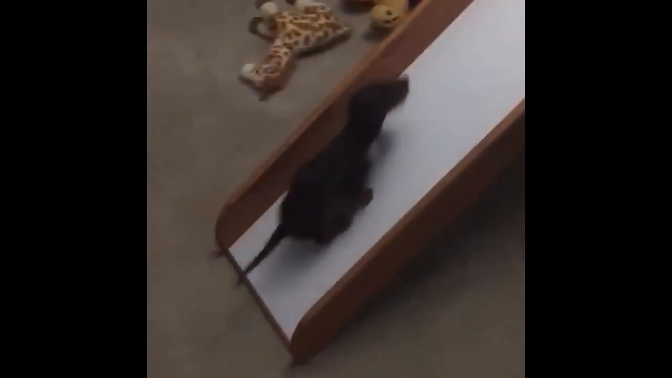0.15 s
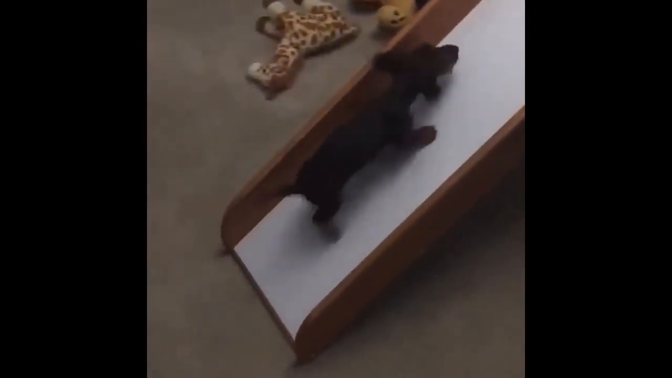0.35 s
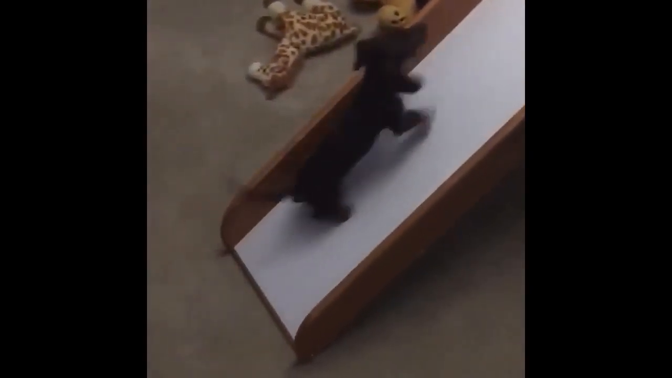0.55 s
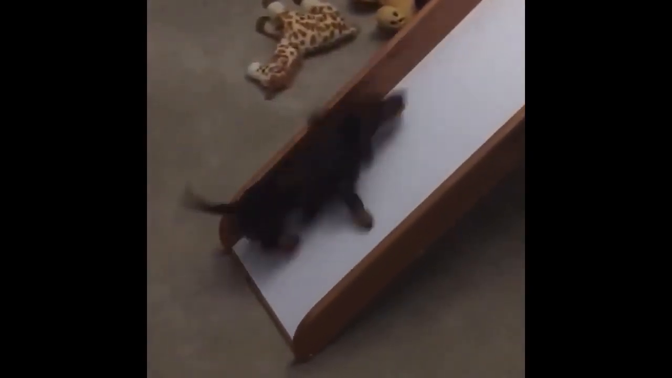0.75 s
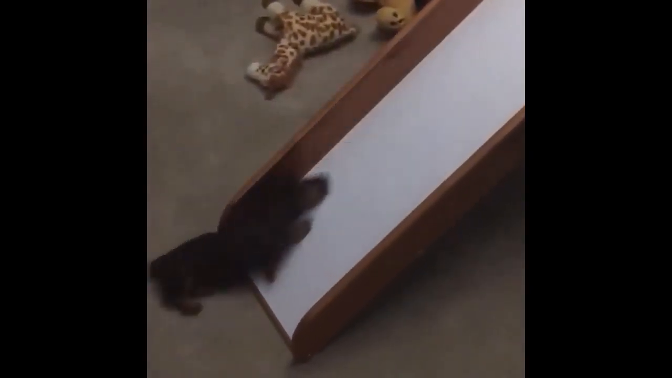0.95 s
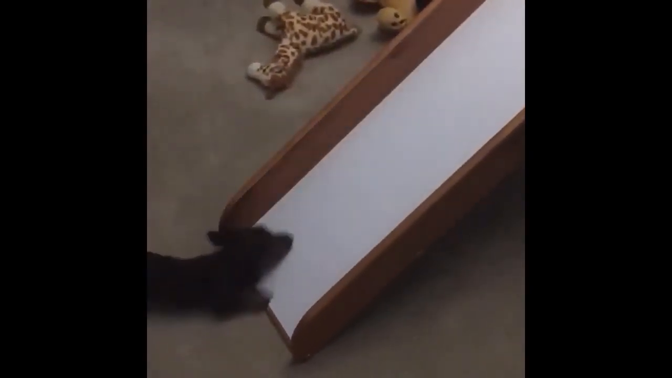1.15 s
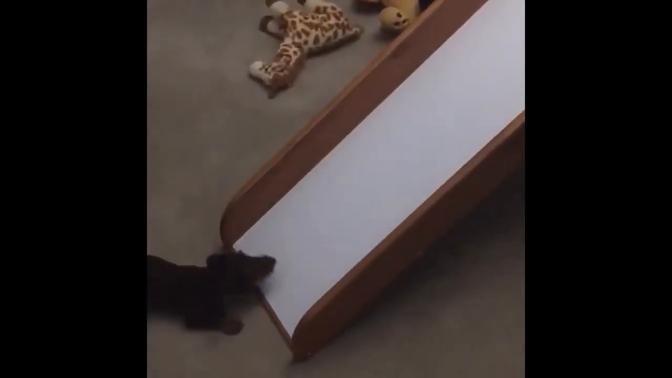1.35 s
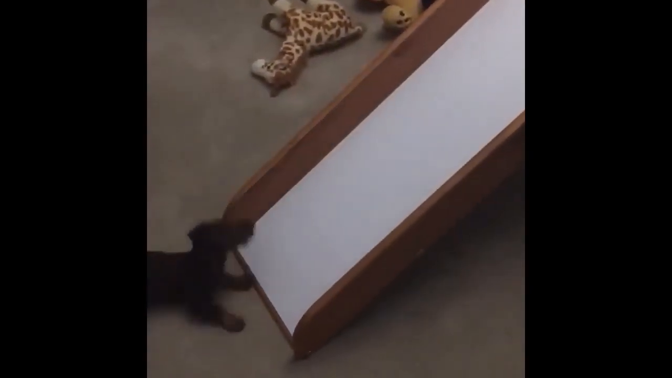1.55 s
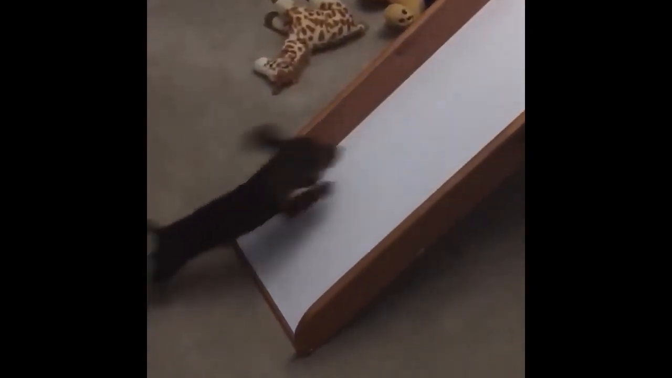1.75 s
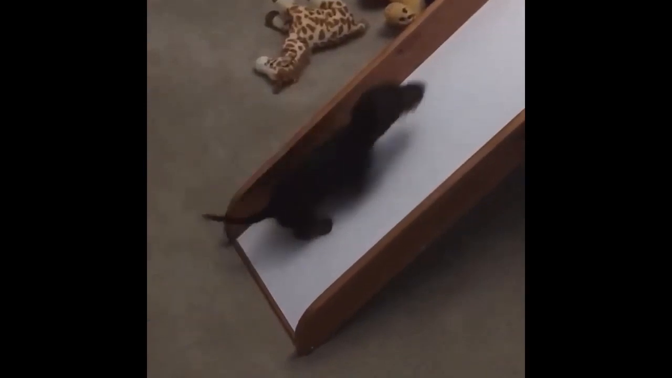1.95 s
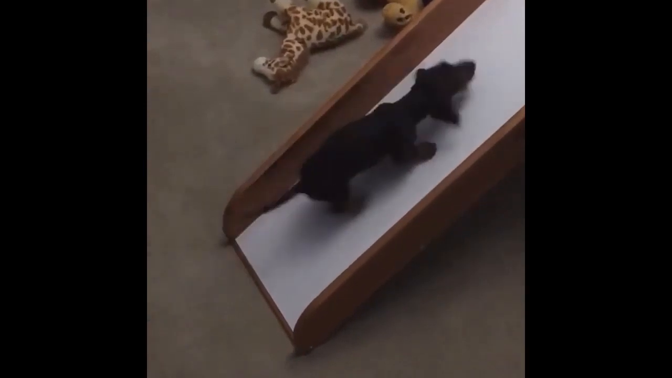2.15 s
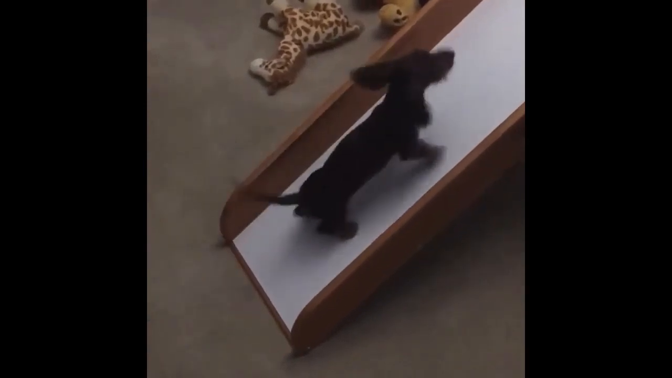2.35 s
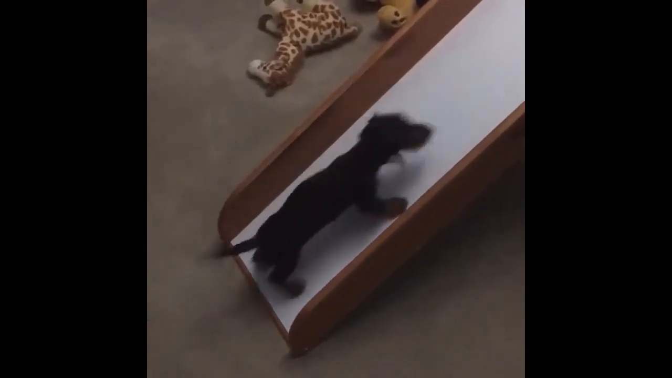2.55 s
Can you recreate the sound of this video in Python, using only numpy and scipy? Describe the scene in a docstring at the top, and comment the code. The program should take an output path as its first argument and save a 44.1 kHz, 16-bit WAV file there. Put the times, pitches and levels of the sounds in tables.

```python
"""A small dog twice scrambles up a smooth wooden ramp in a carpeted room and slips back down.
Paws and weight push on the ramp's decaying modes; pads slap it in short bursts of soft noise.
Claws click in bright bursts, ring the upper modes, and scrape as dense random clicks while sliding.
A paw brushes the carpet once; below lie a noise rumble and a faint, even ticking near the microphone."""
import sys
import numpy as np
from scipy import signal
from scipy.fft import rfft, irfft
from scipy.io import wavfile

SR = 44100
rng = np.random.default_rng(int(sys.argv[2]) if len(sys.argv) > 2 else 0)


def master_out(mix):
    """Clip the mix to full scale and print it as 16-bit PCM to the path in sys.argv[1]."""
    frames = np.transpose(np.atleast_2d(mix))
    ceiling = np.clip(frames, -1, 1)
    pcm = np.round(ceiling * 32767).astype(np.int16)
    wavfile.write(sys.argv[1], SR, pcm)


N = 114660

# Paws landing on the ramp. Each row: start in seconds, pad thump in dB, slap in dB, weight in dB,
# brightness in Hz (slap low-pass; also sets the pad's contact time).
PAW_LANDINGS = [(.036, -47, -65.5, -35.5, 300), (.205, -45, -42, -56, 1970), (0.225, -47, -72, -45, 900),
                (.234, -31.5, -43.5, -54, 1980), (.305, -35, -60, -52, 250),
                (.320, -25.5, -34.5, -20, 1640), (0.353, -30, -50, -27, 910), (0.422, -40, -45, -69, 1910),
                (.477, -33, -39, -27, 583), (.611, -37.5, -34.5, -21.5, 1690), (0.688, -54, -51, -30, 291),
                (0.781, -54, -46, -46, 1490), (.918, -35.5, -50, -47, 350), (0.9459, -23.5, -23, -44, 770),
                (.976, -21, -23.5, -11.5, 630), (.985, -55, -30.5, -47, 1840),
                (0.994, -33, -32.5, -36, 806), (1.116, -36, -34.5, -17.5, 1720),
                (1.134, -39, -43, -34, 940), (1.343, -45.5, -66, -32, 274), (1.381, -58, -58, -28, 1440),
                (1.475, -70, -84, -65, 905), (1.812, -58.5, -58.5, -32.5, 1520),
                (1.9633, -33, -36.5, -28.5, 810), (2.0835, -22.5, -34, -40, 1500),
                (2.1, -31, -50, -25, 1500), (2.158, -46, -42.5, -45, 1700),
                (2.194, -32.5, -34.5, -44, 2040), (2.228, -34, -41.5, -33, 1310),
                (2.274, -47, -44.5, -24.5, 920), (2.377, -39.5, -66, -37, 250), (2.546, -58, -61, -35, 250)]
# Modes of the ramp. Each row: frequency in Hz, level in dB, t60 in seconds.
RAMP_MODES = [(46.2, -12, 0.45), (61.5, -6.5, 0.27), (136.56, -5, 0.48), (153, -4, 0.18), (185, 1.5, 0.2),
              (218.5, -1.5, 0.24), (279.3, -7.5, 0.16), (341, -13.5, 0.3), (411.5, -13.5, 0.15),
              (525, -13.5, 0.091), (650.5, -13.5, 0.14), (695, -28, 0.21), (886, -20, 0.1),
              (1184, -9.5, 0.053), (1401, -14, 0.041), (1588, -19.5, 0.074)]
# Claws striking the surface. Each row: start in seconds, click in dB,
# upper-mode ring in dB before CLAW_RING_GAIN_DB, brightness in Hz (capped at TOP_HZ).
CLAW_STRIKES = [(0.2054, -34, -65, 11700), (0.2333, -31.5, -45, 11400), (.296, -43, -62, 8950),
                (0.324, -35.5, -43, 10700), (0.364, -34, -62, 8000), (0.421, -27.5, -31, 11300),
                (0.4769, -32, -34, 10900), (0.7813, -43, -43, 11800), (.862, -49, -64, 6960),
                (0.925, -54, -59, 6000), (0.943, -29.5, -69, 6800), (0.961, -27, -54, 4500),
                (0.995, -36.5, -62, 13000), (1.021, -33.5, -54, 15000), (1.031, -35, -24.5, 16000),
                (1.119, -40, -53, 6000), (1.3791, -42.5, -32, 5970), (1.801, -54, -39, 8100),
                (1.967, -38.5, -36, 8300), (1.985, -38.5, -35, 7750), (2.1, -36.5, -45, 9900),
                (2.161, -39.5, -32, 7950), (2.1949, -28, -28, 11800), (2.234, -35.5, -43, 8800),
                (2.273, -40, -54, 7800), (2.501, -34, -44, 11500), (2.558, -36, -63, 11200)]
# Claws sliding, one level curve for each spell on the ramp. Each row: time in seconds, level in dB.
SLIDE_CURVES = [
    [(.205, -44), (.25, -50.5), (.28, -56.5), (.34, -45), (.43, -42.5), (.51, -42), (.59, -51.5),
     (.66, -50), (.71, -44), (.775, -48)],
    [(.78, -43), (.784, -40), (.84, -39.5), (.875, -41.5), (.912, -44), (.935, -39), (.98, -46),
     (1.025, -41), (1.075, -47.5), (1.15, -52), (1.18, -48), (1.28, -46), (1.35, -47), (1.40, -61.5),
     (1.47, -70)],
    [(1.97, -53.5), (2.03, -57.5), (2.085, -56.5), (2.11, -45), (2.14, -51), (2.185, -50), (2.21, -41.5),
     (2.26, -47), (2.35, -63.5), (2.39, -53.5), (2.44, -53.5), (2.46, -46), (2.6, -42)],
]
# Spectrum of a pad slap. Each row: frequency in Hz, relative density in dB per Hz.
SLAP_COLOUR = [(90, -41.5), (200, -3.5), (400, -6), (680, -1), (900, -8.5), (1250, -3.5), (1700, -9.5),
               (2200, -14.5), (4000, -28.5), (15000, -64)]
# Spectrum of a claw click. Each row: frequency in Hz, relative density in dB per Hz.
CLAW_COLOUR = [(200, 6), (800, -9), (1400, -8.5), (2400, -8), (3400, 0), (4200, 5.5), (5000, 1.5),
               (8500, 0), (10500, -5.5), (15500, -5)]
# Spectrum of the first skid. Each row: frequency in Hz, relative density in dB per Hz.
SKID_COLOUR = [(200, -4.5), (600, -7.5), (880, -0.5), (1050, -7), (1370, 1), (1480, -3.5), (1600, 8),
               (1800, -8.5), (2200, -12.5), (3600, -4.5), (4500, -1.5), (5200, -7.5), (6800, -13),
               (8000, -18), (15500, -36)]
# Spectrum of the sliding claws. Each row: frequency in Hz, relative density in dB per Hz.
SCRAPE_COLOUR = [(150, -24.5), (400, -13.5), (900, -11), (1250, -3), (1700, -5), (2300, -10.5), (2900, -10),
                 (3600, -5.5), (4150, 3), (4900, -6.5), (6500, -7.5), (9000, -9.5), (10300, -18),
                 (15500, -26.5)]
# Spectrum of a paw on carpet. Each row: frequency in Hz, relative density in dB per Hz.
CARPET_COLOUR = [(100, -51), (280, 9.5), (480, -6), (700, -8), (1300, -13), (2500, -24), (6000, -32.5),
                 (15000, -41)]
# Spectrum of the room rumble. Each row: frequency in Hz, relative density in dB per Hz.
FLOOR_COLOUR = [(20, -51), (30, 10), (65, -2), (95, -1.5), (180, -13), (300, -19.5), (500, -21),
                (900, -22.5), (1300, -22.5), (2400, -35), (3500, -34.5), (4200, -26.5), (5000, -37),
                (7800, -36), (9100, -31.5), (10500, -43), (15500, -47)]

CONTACT_CYCLES = 1.04  # pad contact, in periods of its brightness
WEIGHT_S, WEIGHT_LAG_S = 0.014, 0.0099
BOARD_RISE_S, MODE_SCATTER_DB, BOARD_ROOM_DB = 0.00076, 3, -6
PAW_DAMP_S, PAW_DAMP_DB = 0.0046, 5  # the paw stays on the board and soaks up the first of the ring
SLAP_RISE_S, SLAP_T60_S, SLAP_ROOM_DB = 0.002, 0.046, -3
CLAW_RISE_S, CLAW_T60_S, CLAW_ROOM_DB = 0.00018, 0.038, -7
CLAW_LOWEST_HZ, CLAW_RING_GAIN_DB = 1080, 1.5  # a claw is too light to move the modes below this
SKID_START_S, SKID_RISE_S, SKID_T60_S, SKID_DB = 0, 0.0034, 0.14, -41.5
CATCHES_PER_S, CATCH_SPREAD_DB = 7000, -2.5
JUDDER_HZ, JUDDER_DB = 103.9, 2.58
SNAGS_PER_S, SNAG_DB, SNAG_SPREAD_DB, SNAG_T60_S = 220, -9.5, 2, 0.0057
LOW_SPLIT_HZ, HIGH_SPLIT_HZ = 2500, 5200
SCRAPE_DRIFT_HZ, SCRAPE_DRIFT_DB, SCRAPE_ROOM_DB = 24.54, 0.5, -10.5
SCUFF_START_S, SCUFF_RISE_S, SCUFF_T60_S, SCUFF_DB = 1.595, 0.03, 0.15, -47.5
TICK_OFFSET_S, TICK_PERIOD_S, TICK_WIDTH_S = 0.0897, 0.05, 0.00036
TICK_HZ, TICK_DB, TICK_EDGE_DB = 6200, -52.5, -49
FLOOR_DB = -57
ROOM_T60_S, ROOM_GAP_S = 0.22, 0.008
TAIL_HIGHPASS_HZ = 104  # the room tail is high-passed here; lower sounds stay dry
TOP_HZ = 15750


def undb(db):
    """Decibels to gain."""
    return 10 ** (np.asarray(db) / 20)


def unit(x):
    """Scale to rms 1."""
    return x / np.sqrt(np.mean(x ** 2))


def add(out, start_s, sound):
    """Mix a sound in at a time."""
    i = max(int(start_s * SR), 0)
    out[i:i + len(sound)] += sound[:max(len(out) - i, 0)]


def filtered(x, order, hz, kind="low"):
    """Causal Butterworth filter."""
    return signal.sosfilt(signal.butter(order, hz, kind, fs=SR, output="sos"), x)


def colour(x, points):
    """Minimum-phase filter through (Hz, dB) points; white noise keeps its level."""
    size = 4096
    bins_hz = np.arange(size // 2 + 1) * SR / size
    hz, db = np.array(points, float).T
    gain = unit(undb(np.interp(np.log(bins_hz + 1), np.log(hz), db)))
    # folding the cepstrum makes the filter causal
    cepstrum = irfft(np.log(gain))
    cepstrum[1:size // 2] *= 2
    cepstrum[size // 2 + 1:] = 0
    impulse = irfft(np.exp(rfft(cepstrum)))
    return signal.fftconvolve(x, impulse)[:len(x)]


def strike(rise_s, t60_s):
    """One second of envelope that rises and dies away; peak 1."""
    t = np.arange(SR) / SR
    env = (1 - np.exp(-t / rise_s)) * np.exp(-np.log(1000) * t / t60_s)
    return env / env.max()


def push(length_s):
    """A smooth force of unit area: one sine-squared hump."""
    t = np.arange(int(length_s * SR) + 2) / SR
    force = np.sin(np.pi * np.minimum(t / length_s, 1)) ** 2
    return force / force.sum()


def walk(points_per_s):
    """Random values joined by straight lines; rms 1."""
    values = rng.standard_normal(N)
    return unit(np.interp(np.arange(N) / SR * points_per_s, np.arange(N), values))


def grains(per_s, spread_db):
    """Clicks at random moments, of either sign and uneven size; rms 1."""
    present = rng.random(N) < per_s / SR
    sign = np.sign(rng.standard_normal(N))
    size = undb(spread_db * rng.standard_normal(N))
    return unit(present * sign * size)


def impacts(rows, rise_s, t60_s, points):
    """Short coloured bursts of contact noise, one for each (s, dB, brightness Hz) row."""
    out, env = np.zeros(N), strike(rise_s, t60_s)
    for (start_s, db, hz), noise in zip(rows, rng.standard_normal((len(rows), SR))):
        burst = filtered(env * noise, 3, min(hz, TOP_HZ))
        add(out, start_s, undb(db) * burst)
    return colour(out, points)


def room(x, wet_db):
    """The direct sound and the short decaying-noise tail of a carpeted room."""
    tail = rng.standard_normal(SR) * strike(ROOM_GAP_S, ROOM_T60_S)
    tail = filtered(tail, 3, TAIL_HIGHPASS_HZ, "high")
    tail /= np.linalg.norm(tail)
    return x + undb(wet_db) * signal.fftconvolve(x, tail)[:N]


def modes():
    """The ring of each ramp mode, one to a row: a quick first drop, then a slower fade."""
    t = np.arange(SR) / SR
    paw_damping = undb(PAW_DAMP_DB * (np.exp(-t / PAW_DAMP_S) - 1.0))
    rings = []
    for k, (hz, db, t60_s) in enumerate(RAMP_MODES):
        tone = np.sin(2 * np.pi * hz * t) * strike(BOARD_RISE_S, t60_s)
        rings.append((-1) ** k * undb(db) * tone)  # alternate polarity
    return paw_damping * np.array(rings)


def board():
    """Each pad knocks the modes; the weight follows as a slow push that moves only the lowest."""
    out, rings = np.zeros(N), modes()
    spots = rng.standard_normal((len(PAW_LANDINGS), len(RAMP_MODES)))
    for (start_s, pad_db, _, weight_db, hz), spot in zip(PAW_LANDINGS, spots):
        ring = undb(MODE_SCATTER_DB * spot) @ rings
        thump = signal.fftconvolve(ring, push(CONTACT_CYCLES / hz))
        boom = signal.fftconvolve(ring, push(WEIGHT_S))
        add(out, start_s, undb(pad_db) * thump)
        add(out, start_s + WEIGHT_LAG_S, undb(weight_db) * boom)
    return room(out, BOARD_ROOM_DB)


def slaps():
    """Pads slap the surface; a softer landing is duller."""
    rows = [(start_s, slap_db, hz) for start_s, _, slap_db, _, hz in PAW_LANDINGS]
    return room(impacts(rows, SLAP_RISE_S, SLAP_T60_S, SLAP_COLOUR), SLAP_ROOM_DB)


def claws():
    """Claws click and ring the ramp's upper modes; a paw first skids onto the foot of the ramp."""
    mode_hz = np.array(RAMP_MODES)[:, :1]
    rings = modes() / (1 + (CLAW_LOWEST_HZ / mode_hz) ** 6)
    rows = [(start_s, click_db, hz) for start_s, click_db, _, hz in CLAW_STRIKES]
    out = impacts(rows, CLAW_RISE_S, CLAW_T60_S, CLAW_COLOUR)
    spots = rng.standard_normal((len(CLAW_STRIKES), len(RAMP_MODES)))
    for (start_s, _, ring_db, _), spot in zip(CLAW_STRIKES, spots):
        add(out, start_s, undb(ring_db + CLAW_RING_GAIN_DB + MODE_SCATTER_DB * spot) @ rings)
    skid = impacts([(SKID_START_S, SKID_DB, TOP_HZ)], SKID_RISE_S, SKID_T60_S, SKID_COLOUR)
    return room(out + skid, CLAW_ROOM_DB)


def slide_effort():
    """Gain of the sliding claws: each spell follows its curve, with silence outside."""
    t, effort = np.arange(N) / SR, np.zeros(N)
    for curve in SLIDE_CURVES:
        during = (t >= curve[0][0]) & (t < curve[-1][0])
        effort += undb(np.interp(t, *np.array(curve).T)) * during
    return effort


def scrape():
    """Claws catch and slip thousands of times a second, with coarser snags; the colour drifts."""
    fine_clicks = grains(CATCHES_PER_S, CATCH_SPREAD_DB)
    judder = undb(JUDDER_DB * walk(JUDDER_HZ))
    catches = unit(fine_clicks * judder)
    snag_hits = np.abs(grains(SNAGS_PER_S, SNAG_SPREAD_DB))
    snag_env = signal.fftconvolve(snag_hits, strike(1 / SR, SNAG_T60_S))[:N]
    snags = unit(snag_env * rng.standard_normal(N))
    friction = unit(catches + undb(SNAG_DB) * snags)
    hiss = colour(slide_effort() * friction, SCRAPE_COLOUR)

    # zero-phase splits; the bands add back up to the hiss
    below_low = signal.sosfiltfilt(signal.butter(3, LOW_SPLIT_HZ, fs=SR, output="sos"), hiss)
    below_high = signal.sosfiltfilt(signal.butter(3, HIGH_SPLIT_HZ, fs=SR, output="sos"), hiss)
    bands = (below_low, below_high - below_low, hiss - below_high)
    drifting = sum(band * undb(SCRAPE_DRIFT_DB * walk(SCRAPE_DRIFT_HZ)) for band in bands)
    return room(drifting, SCRAPE_ROOM_DB)


def carpet_scuff():
    """A paw brushes the carpet: one soft, slow-rising noise burst."""
    row = (SCUFF_START_S, SCUFF_DB, TOP_HZ)
    return impacts([row], SCUFF_RISE_S, SCUFF_T60_S, CARPET_COLOUR)


def ticking():
    """Tiny high ticks at an even rate: a sharp edge inside a very short ping."""
    t = np.arange(N) / SR - TICK_OFFSET_S
    near_s = (t + TICK_PERIOD_S / 2) % TICK_PERIOD_S - TICK_PERIOD_S / 2  # time from the nearest tick
    ping = undb(TICK_DB) * np.sin(2 * np.pi * TICK_HZ * near_s)
    edge = undb(TICK_EDGE_DB) * np.sinc(near_s * SR)
    return np.exp(-(near_s / TICK_WIDTH_S) ** 2) * (ping + edge)


def room_floor():
    """Steady noise, mostly low rumble."""
    return undb(FLOOR_DB) * unit(colour(rng.standard_normal(N), FLOOR_COLOUR))


def scene():
    """Dog, ramp and room, the same in both channels."""
    scuff = carpet_scuff()
    floor = room_floor()
    dog = board() + slaps() + claws() + scrape() + scuff
    return np.tile(dog + ticking() + floor, (2, 1))


def record(dry):
    """The microphone drops the deepest bass and cuts the top."""
    thin = filtered(dry, 2, 32, "high")
    return signal.sosfilt(signal.ellip(10, .2, 80, TOP_HZ, fs=SR, output="sos"), thin)


dry = scene()
out = record(dry)
master_out(out)
```